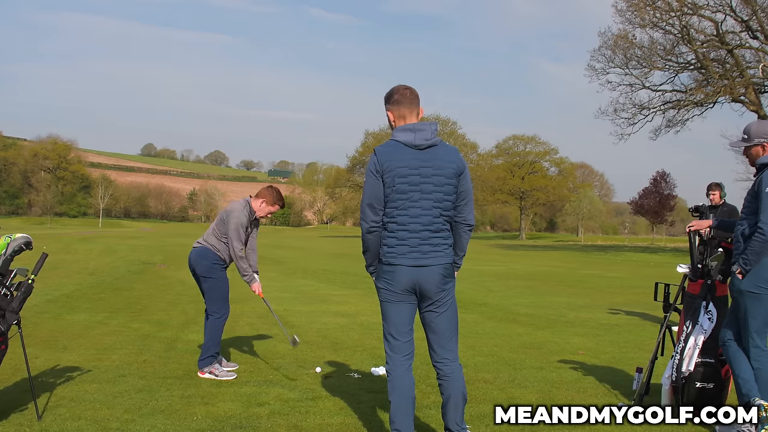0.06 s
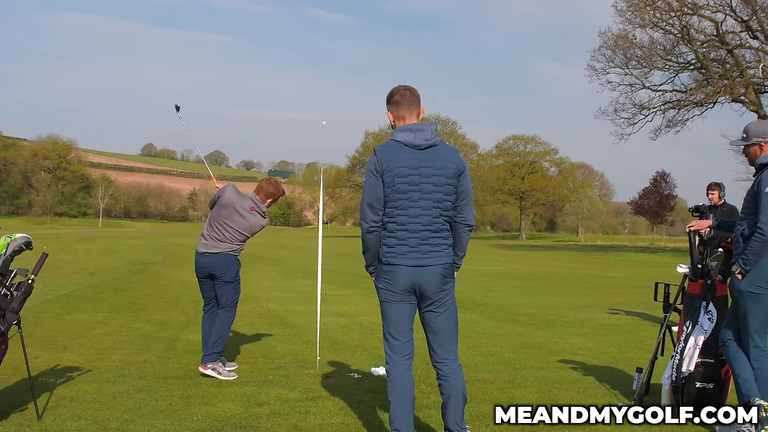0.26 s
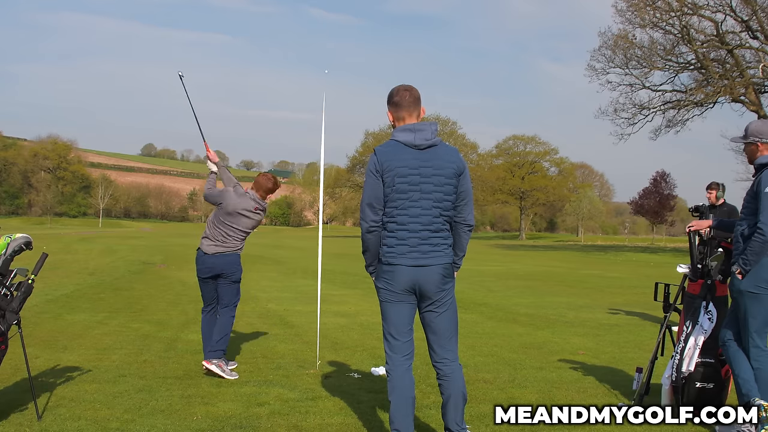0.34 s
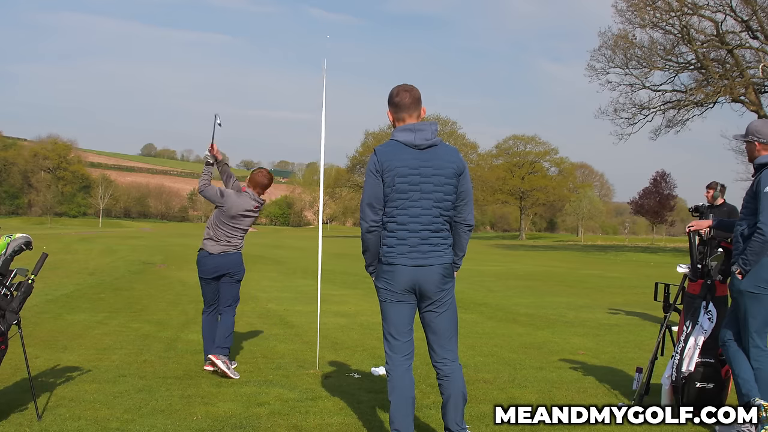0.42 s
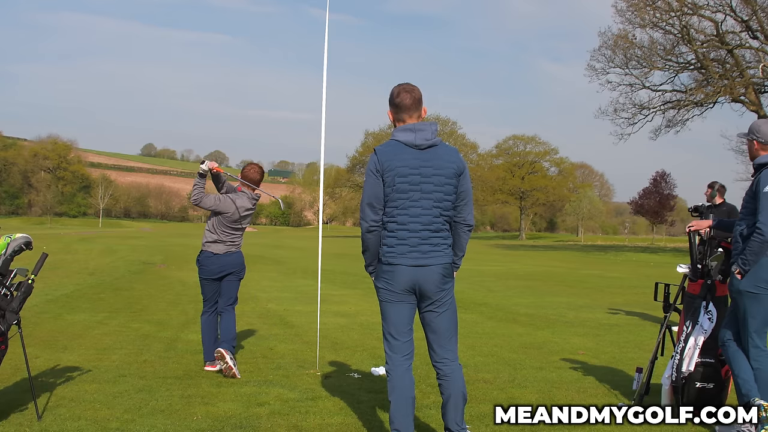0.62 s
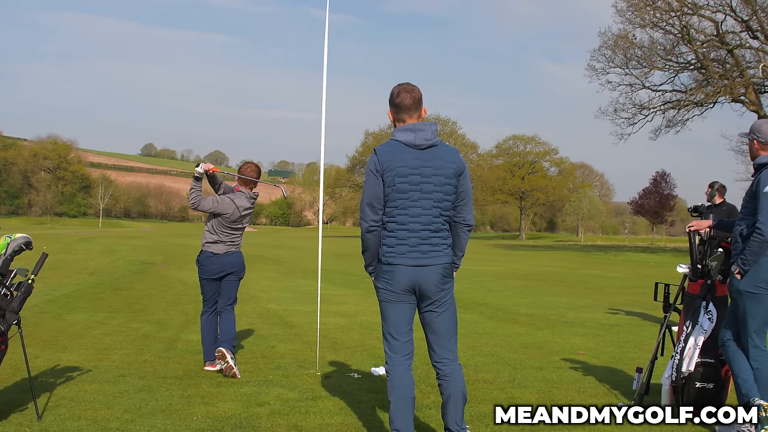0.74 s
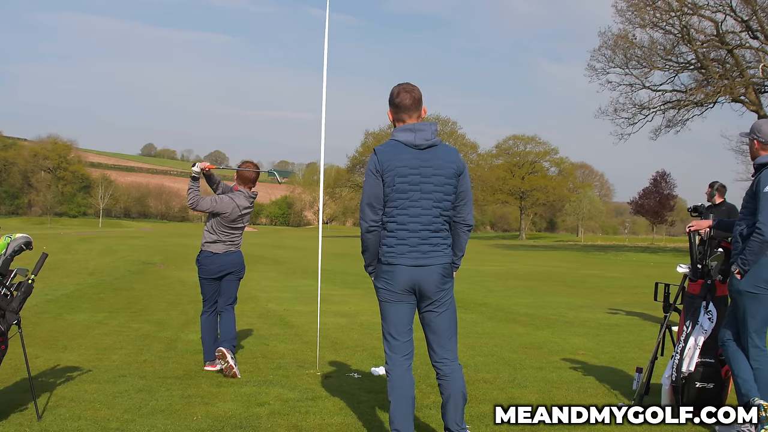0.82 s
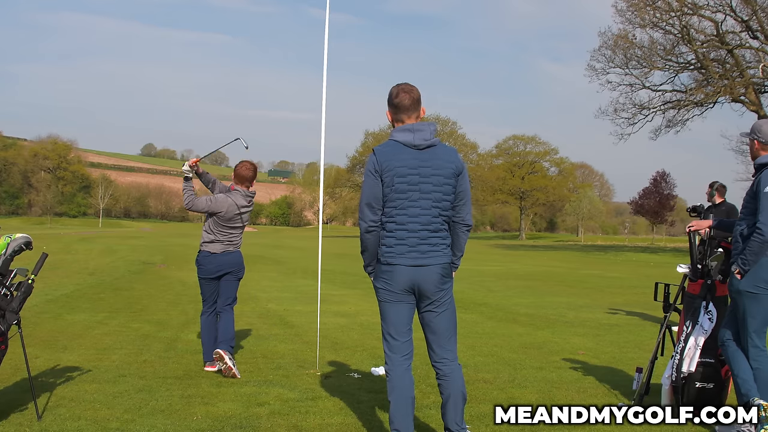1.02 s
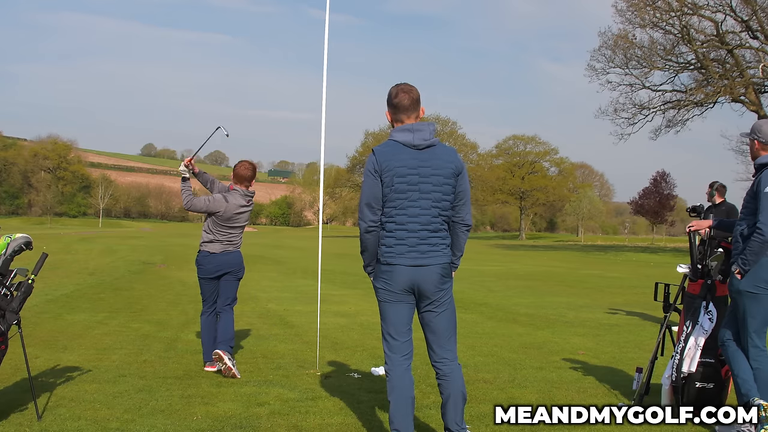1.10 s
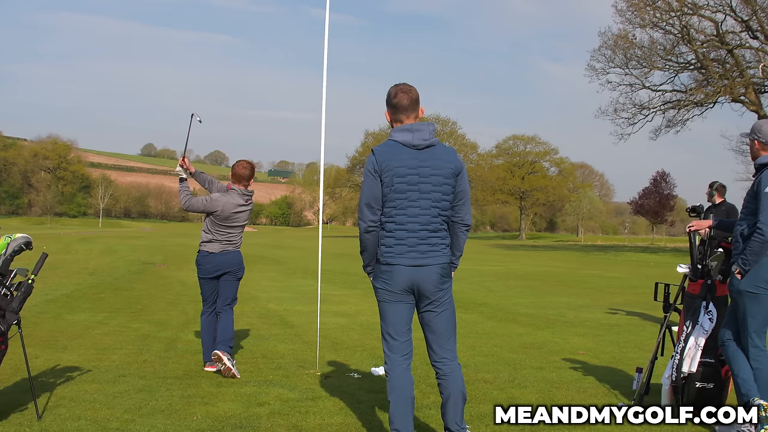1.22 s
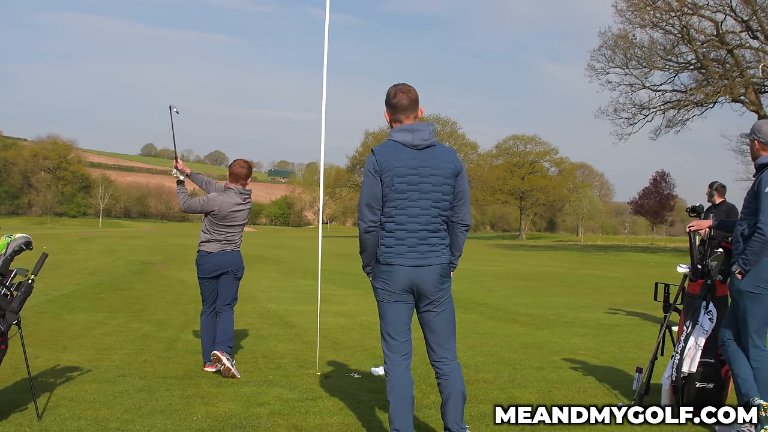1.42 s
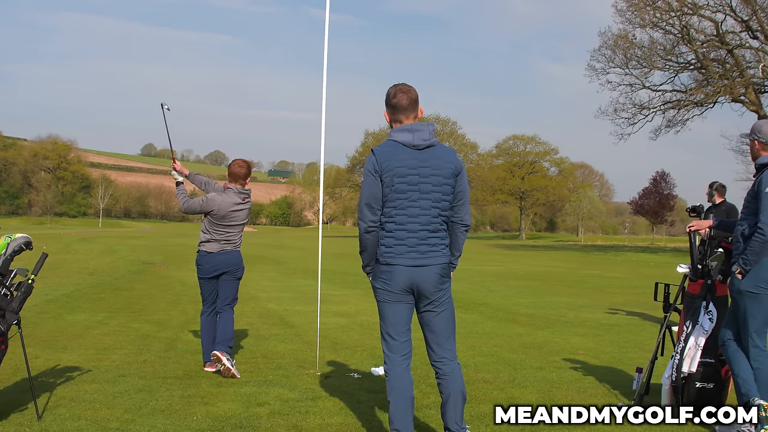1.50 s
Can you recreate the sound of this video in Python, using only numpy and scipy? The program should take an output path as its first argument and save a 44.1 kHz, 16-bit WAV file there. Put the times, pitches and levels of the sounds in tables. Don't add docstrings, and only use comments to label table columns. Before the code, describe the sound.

A golf iron strikes a ball with a hard, bright metallic crack after a brief airy whoosh, followed by small ticks, soft thumps and jacket rustle, with light wind buffeting a body-worn microphone on an open course.

```python
import sys
import numpy as np
from scipy import signal
from scipy.fft import rfft, irfft, next_fast_len
from scipy.io import wavfile
from scipy.ndimage import uniform_filter1d, map_coordinates

SR = 44100
rng = np.random.default_rng(int(sys.argv[2]) if len(sys.argv) > 2 else 0)


def volts(x):
    e = np.asarray(x, float) / 20
    return 10 ** e


def int16_out(signal):
    q = np.round(np.clip(np.atleast_2d(signal).T, -1, 1) * 32767)
    wavfile.write(sys.argv[1], SR, q.astype(np.int16))


N = 68355
BURST_S = .2

# frequency in Hz, level in dB per Hz.
RUSTLE_COLOUR = [(300, -30.5), (800, -6), (2200, -7.5), (6000, -10.5), (11400, -7.5), (13600, -12),
                 (14400, -19.5), (15200, -45)]


def unit(x):
    return x / np.sqrt(np.mean(x ** 2) + 1e-20)


def curves(rows):
    s, *cols = np.transpose(rows)
    return [np.interp(np.arange(N) / SR, s, c) for c in cols]


def wobble(rate):
    knots = rng.standard_normal(int(N * rate / SR) + 4)
    return map_coordinates(knots, [np.arange(N) * rate / SR])


def colour(x, points):
    m = next_fast_len(N + 8192)
    f, db = np.transpose(points)
    log_hz = np.log(np.fft.rfftfreq(m, 1 / SR) + 1)
    gain = volts(np.interp(log_hz, np.log(f + 1), db))
    return unit(irfft(rfft(x, m) * gain, m)[:N])


def hiss(points):
    return colour(rng.standard_normal(N), points)


def after(t60, rise):
    t = np.arange(int(BURST_S * SR)) / SR
    return t, volts(-60 * t / t60) * (1 - np.exp(-t / rise))


def ring(hz, t60, rise):
    t, env = after(t60, rise)
    return env * np.sin(2 * np.pi * hz * t)


def add(out, s, burst):
    part = out[round(s * SR):][:len(burst)]
    part += burst[:len(part)]


def strike():
    # start in seconds, ring in dB, crack in dB.
    contacts = [
        (.2459, -20.5, -14),
        (.2474, -18.5, -13.5),
        (.2493, -7.5, -20.5),
        (.2543, -18.5, -21),
        (.2585, -18, -21),
        (.2612, -27.5, -26.5),
        (.266, -50, -38),
    ]
    # frequency in Hz, level in dB, 60 dB decay in seconds.
    head_modes = [(330, -13.5, .025), (660, -13, .018), (870, -15, .016), (1293, -15, .016),
                  (2070, -10.5, .012), (2870, -8, .012), (3400, -9, .012), (4000, -6, .018),
                  (4207, 0, .016), (6150, -16, .012), (8100, -18.5, .006), (11600, -17, .008)]
    # frequency in Hz, level in dB per Hz.
    crack_colour = [(100, -25), (280, -2), (2000, -4), (4300, -4.5), (5200, -20), (6200, -13.5),
                    (12200, -14.5), (15500, -32.5)]
    out, noise, size = np.zeros(N), hiss(crack_colour), int(BURST_S * SR)
    crack_env = after(.016, .0003)[1]
    for k, (s, ring_db, crack_db) in enumerate(contacts):
        scatter_db = rng.normal(0, 2.5, len(head_modes))
        modes = sum(volts(db + e) * ring(hz, t60, .0006)
                    for (hz, db, t60), e in zip(head_modes, scatter_db))
        add(out, s, volts(ring_db) * modes)
        add(out, s, volts(crack_db) * crack_env * noise[k * size // 2:][:size])
    return out


def turf():
    out = np.zeros(N)
    spray = volts(-46.5 + 3 * wobble(300)) * hiss(RUSTLE_COLOUR)
    envelope = after(.12, .004)[1]
    add(out, .262, envelope * spray[:len(envelope)])
    return out


def jolt():
    out = np.zeros(N)
    add(out, .248, volts(-22) * ring(44, .1, .002))
    return out


def whistle():
    # time in seconds, shedding pitch in Hz, level in dB.
    swing = [
        (.165, 395, -59.5),
        (0.185, 408.4, -43.5),
        (.194, 425, -57),
        (.203, 495, -38),
        (.219, 500, -55.5),
        (.238, 545, -34),
        (.247, 505, -44.5),
        (.285, 424, -47),
        (.3, 430, -66),
    ]
    silent_start, silent_end = (0.1, swing[0][1], -110), (.33, swing[-1][1], -110)
    hz, db = curves([silent_start] + swing + [silent_end])
    phase = 2 * np.pi * np.cumsum(hz * (1 + .04 * wobble(90))) / SR
    overtone = volts(-20.5 + 4 * wobble(80)) * np.sin(2 * phase)
    tone = np.sin(phase) + overtone
    return np.sqrt(2) * volts(db + 2 * wobble(70)) * tone


def wake():
    # time in seconds, level in dB.
    wake_level = [(.13, -76.5), (.2, -49.5), (.24, -52.5), (.29, -52.5), (.31, -76)]
    # frequency in Hz, level in dB per Hz.
    wake_colour = [(410, -28.5), (700, 3), (1390, -17.5), (2840, -12), (3630, -25.5), (12300, -31),
                   (14200, -36.5), (15500, -59.5)]
    db, = curves([(0.0091, -120)] + wake_level + [(.4, -120)])
    return volts(db + 2 * wobble(120)) * hiss(wake_colour)


def ticks():
    # start in seconds, peak in dB, pitch in Hz, crack in dB relative to the modes.
    hard_taps = [(.0195, -36.5, 10700, -16), (0.0192, -57.5, 3800, -4), (.129, -63.5, 11500, 7),
                 (.137, -62, 11600, 4), (.143, -66, 11400, 3), (.3005, -47.5, 4500, 2.5),
                 (.318, -53, 3300, 5), (0.324, -46.5, 2600, 1), (.3262, -29.5, 2590, -5.5),
                 (.3262, -45, 10100, 5), (.348, -40.5, 2580, -7), (.357, -49, 11400, 7),
                 (.362, -47, 2780, -10), (.3865, -53, 5000, 0), (.3922, -48, 4430, -2),
                 (.4015, -31.5, 2420, -4.5), (0.433, -56, 9000, 9), (.4665, -53, 7600, -10),
                 (0.4803, -28.5, 2620, -6.5), (.4804, -45.5, 10500, 0), (.646, -62, 6000, 6),
                 (.682, -60, 1500, 5), (.682, -56, 4500, 11), (.868, -63, 3000, 10), (1.22, -60, 2500, 0.5),
                 (1.437, -63.5, 4500, 3), (1.461, -60, 11040, 3), (1.475, -62, 10000, 9)]
    t60, rise = .0042, .0002
    crack_env = after(.0051, .00034)[1]
    out = np.zeros(N)
    for s, db, hz, crack_db in hard_taps:
        upper = volts(-2) * ring(min(1.79 * hz, 12000), t60, rise)
        modes = ring(hz, t60, rise) - upper
        band = signal.butter(2, [.6 * hz, min(1.93 * hz, 13500)], "band", fs=SR)
        noise = unit(signal.lfilter(*band, rng.standard_normal(len(modes))))
        add(out, s, volts(db) * (modes + volts(crack_db) * crack_env * noise))
    return out


def thumps():
    # start in seconds, level in dB, pitch in Hz.
    soft_knocks = [(.013, -52.5, 910), (.058, -54, 1400), (0.3079, -33.5, 780), (.378, -41.5, 350),
                   (.414, -43, 595), (0.481, -31.5, 330), (.866, -46, 500)]
    out = np.zeros(N)
    for s, db, hz in soft_knocks:
        add(out, s, volts(db) * ring(hz, 6.3 / hz, 0.2 / hz))
    return out


def jacket():
    # time in seconds, rubbing level in dB.
    rub_level = [(0, -75.5), (.1, -77.5), (.3, -67.5), (.45, -65), (.555, -58), (.61, -64), (.7, -67),
                 (.8, -73.5), (.93, -71.5), (1.02, -75), (1.55, -80)]
    db, = curves(rub_level)
    caught = rng.random(N) < 900 / SR
    catches = caught * rng.standard_normal(N) * volts(2.2 * rng.exponential(1, N))
    rub = colour(rng.standard_normal(N) + volts(-8) * unit(catches), RUSTLE_COLOUR)
    return volts(db + 1.5 * wobble(25) + 1.5 * wobble(90)) * rub


def sleeves():
    # time in seconds, drag level in dB.
    drag_level = [(0, -65), (.04, -83), (.12, -68.5), (.3, -57), (.44, -62.5), (.56, -58.5), (.7, -65),
                  (.8, -70.5), (.85, -62), (.89, -66), (.94, -58.5), (.98, -66), (1.15, -77), (1.55, -80)]
    # frequency in Hz, level in dB per Hz.
    drag_colour = [(120, -29.5), (250, 0), (500, -2.5), (1000, -8), (2500, -19.5), (5000, -34.5)]
    db, = curves(drag_level)
    return volts(db + 1.6 * wobble(60)) * hiss(drag_colour)


def wind():
    # time in seconds, buffeting level in dB.
    gusts = [(0, -55.5), (.09, -59.5), (.21, -51.5), (.3, -49.5), (.448, -53.5), (.482, -46), (.526, -54.5),
             (.58, -51.5), (.61, -43), (.72, -45.5), (.79, -53.5), (.85, -51), (1.01, -48), (1.12, -50.5),
             (1.18, -53.5), (1.29, -52.5), (1.45, -60), (1.55, -63)]
    # frequency in Hz, level in dB per Hz.
    buffet_colour = [(10, -30), (25, -2.5), (45, 0.5), (90, -2), (150, -14.5), (300, -30), (900, -61)]
    flap_colour = [(40, -30), (80, -3.5), (125, 0.5), (200, -9), (350, -19), (600, -37), (1200, -59.5)]
    db, = curves(gusts)
    lumps = volts(wobble(30)) * rng.standard_normal(N)
    low = volts(db - 1.5) * colour(lumps, buffet_colour)
    flaps = volts(2 * wobble(40)) * rng.standard_normal(N)
    low += volts(-58 + 1.506 * (db - db.mean())) * colour(flaps, flap_colour)
    low += 0.083 * (low ** 2 - uniform_filter1d(low ** 2, size=1500)) / volts(db)
    return low


def course():
    # frequency in Hz, level in dB per Hz.
    hush_colour = [(120, -32.5), (200, -0.5), (488, -6), (618, -11.5), (702, -8), (1840, -19.5),
                   (11200, -24), (13600, -27.5), (15500, -50)]
    return volts(-75.5 + 1.2 * wobble(8)) * hiss(hush_colour)


def scene():
    blow = strike() + turf() + jolt()
    swing_air = whistle() + wake()
    clothing = ticks() + thumps() + jacket() + sleeves()
    return (blow + swing_air + clothing + wind() + course())[None]


def band_limit(x):
    return signal.sosfilt(signal.butter(12, 16120, fs=SR, output="sos"), x)


def record(dry):
    hz = np.fft.rfftfreq(N, 1 / SR)
    mix = irfft(rfft(dry) / (1 + (hz / 15000) ** 45), N)
    return band_limit(mix)


dry = scene()
out = record(dry)
int16_out(out)
```